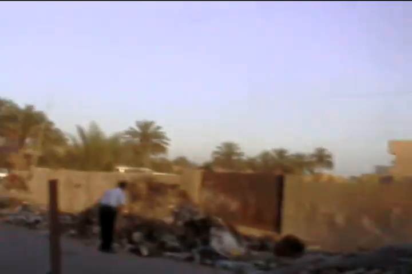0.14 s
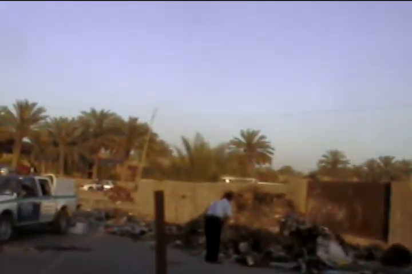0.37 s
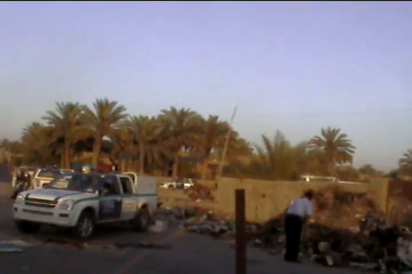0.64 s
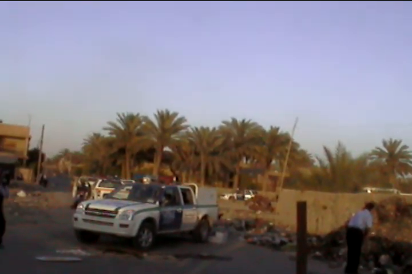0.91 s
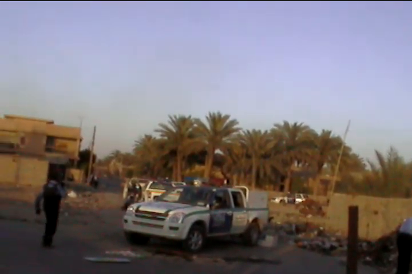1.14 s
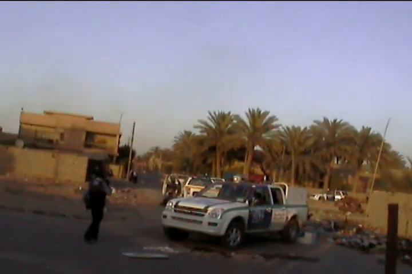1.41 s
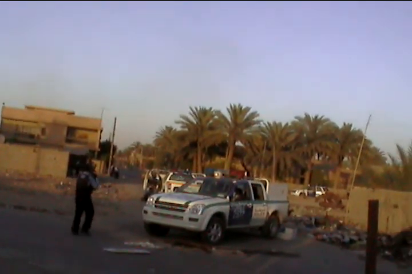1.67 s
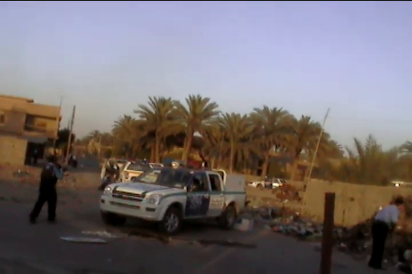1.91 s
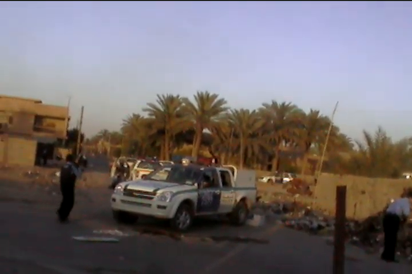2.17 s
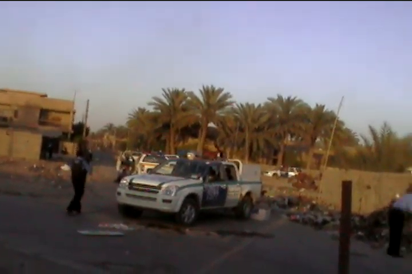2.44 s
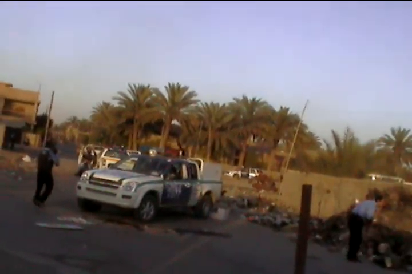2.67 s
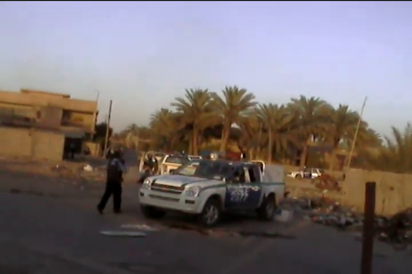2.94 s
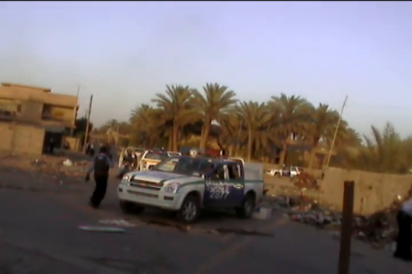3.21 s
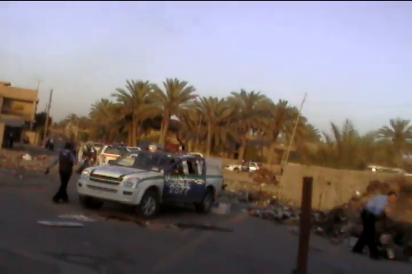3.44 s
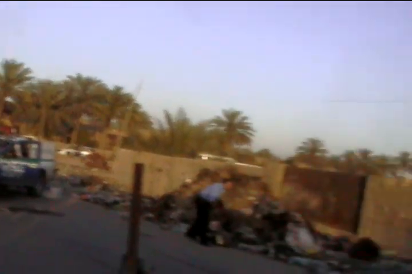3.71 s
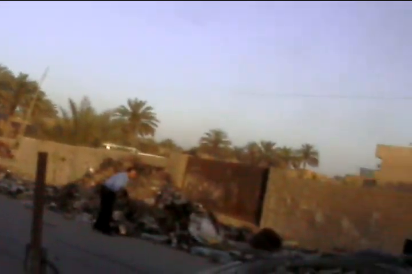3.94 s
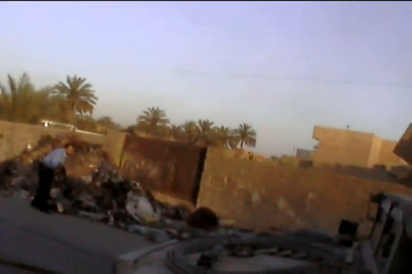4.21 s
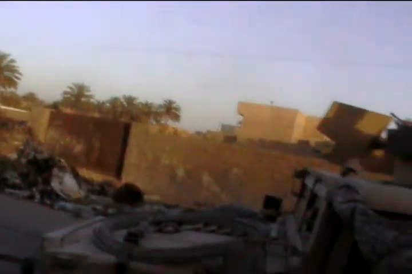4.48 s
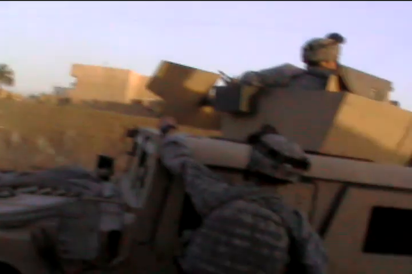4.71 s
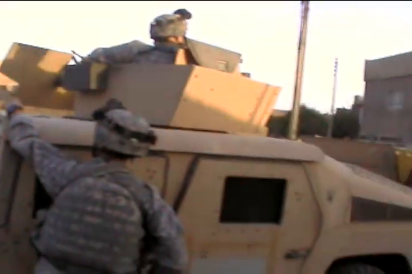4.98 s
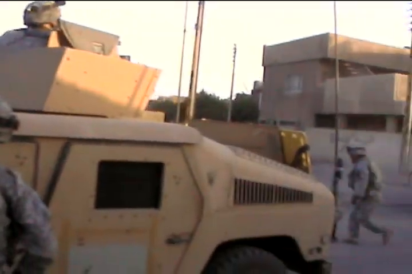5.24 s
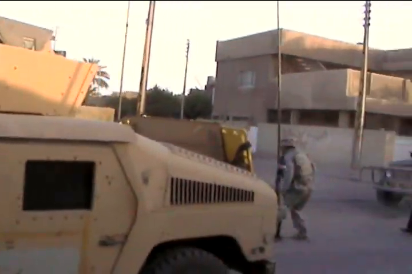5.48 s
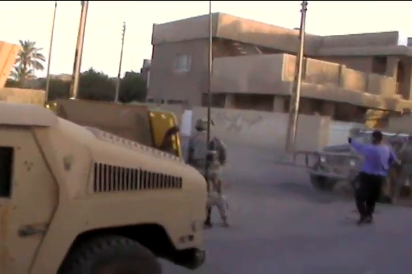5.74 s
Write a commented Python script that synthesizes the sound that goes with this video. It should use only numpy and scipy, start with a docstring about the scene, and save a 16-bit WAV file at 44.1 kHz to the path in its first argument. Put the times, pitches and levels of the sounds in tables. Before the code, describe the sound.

Uneven single rifle shots crack and echo off street walls, one duller shot follows, then three loud close machine-gun bursts overload a small camera microphone.

```python
"""Gunfire in a walled street

A small camera's microphone hears single uneven rifle shots, one shot of a second weapon, then three
bursts of a near machine gun. Each shot is pressure jumps, then thuds, scattered noise and cracks along
wall paths, then decaying street noise. Filtered noise is distant traffic, a wavering tone an idling engine.
The camera overloads: its input clips, a limiter pulls the level down, and hiss lies over both channels."""
import sys
import numpy as np
from scipy import signal
from scipy.fft import rfft, irfft, next_fast_len
from scipy.io import wavfile
from scipy.ndimage import uniform_filter1d

SR = 44100
rng = np.random.default_rng(int(sys.argv[2]) if len(sys.argv) > 2 else 0)


def volts(x):
    """Linear amplitude factor 10**(x/20) for a level x in dB, scalar or array-like."""
    e = np.asarray(x, float) / 20
    return 10 ** e


def pcm_store(signal):
    """Save signal as 16-bit PCM."""
    levels = np.round(np.clip(np.atleast_2d(signal), -1, 1) * 32767)
    wavfile.write(sys.argv[1], SR, levels.astype(np.int16).T)


N = 259041
LENGTH = 60000  # samples made for each shot


def evened(x):
    """Scales to rms 1."""
    return x / np.sqrt(np.mean(x ** 2) + 1e-20)


def read(points, hz):
    """Reads a table on a log-frequency axis."""
    f, value = np.transpose(points)
    return np.interp(np.log(hz + 1), np.log(f + 1), value)


def coloured(x, points, lag=0):
    """Filters by a spectrum, with an optional lag in samples."""
    hz = np.fft.rfftfreq(x.shape[-1], 1 / SR)
    delay = np.exp(-2j * np.pi * hz * lag / SR)
    return irfft(rfft(x) * volts(read(points, hz)) * delay, x.shape[-1])


def add(mix, events, sounds):
    """Places sounds at their times and levels; the mix starts one second early."""
    for (start_s, db), sound in zip(events, sounds):
        part = mix[round((start_s + 1) * SR):][:len(sound)]
        part += volts(db) * sound[:len(part)]


# Rifle, single shots: t/s, level/dB
RIFLE_SHOTS = [(-.16, 1), (-.0105, -2.5), (.142, -0.5), (0.3322, -1.5), (0.4739, -1), (0.608, -1.5),
               (0.7213, -1), (1.0897, -1.5), (1.2946, -1), (1.445, -0.5), (1.6066, -0.5), (1.799, -0.5)]
# Rifle pressure jumps, each a push and a longer pull: delay t/s, level/dB, push t/s
RIFLE_BLASTS = [(0, 6, 0.00094), (.0015, 15.5, 0.0011), (0.018, 9, 0.00063), (.02, 12, 0.0013)]
# Rifle, direct sound and wall echoes: delay t/s, thud level/dB, thud f/Hz, t60/s, scatter level/dB
RIFLE_PATHS = [(0, -8.5, 638, 0.038, -2), (.0045, -19, 538, 0.048, -11), (.0175, 6, 444, 0.034, 6),
               (.004, -17, 85, 0.047, -25.5), (0.02, -0.5, 156, 0.056, -23.5),
               (0.031, -22.5, 387, 0.11, -16), (.121, -8, 700, 0.029, -29), (.125, -3.5, 476, 0.016, -24),
               (.153, -3.5, 528, 0.046, -18.5), (.157, -5.5, 445, 0.019, -25.5),
               (.2, -34, 540, 0.61, -28.5), (.24, -11.5, 498, 0.055, -24)]
# Rifle blast scattered off walls and cars: f/Hz, level/dB per Hz
RIFLE_SCATTER = [(47, -41), (80, -16), (345, -8), (522, -5.5), (756, -7), (948, -15), (1320, -12),
                 (2070, -17), (5570, -30), (11000, -46.5), (14300, -77), (22000, -120)]


def rifle(mix):
    """Uneven single shots, thrown back by the walls along the same paths each time."""
    cracks = (-9, -17.5, 170)  # direct level/dB, echo level at zero delay/dB, loss in dB per s of delay
    heard = shots(len(RIFLE_SHOTS), RIFLE_BLASTS, RIFLE_PATHS, cracks, RIFLE_SCATTER,
                  tail_db=-17.0, likeness=0.836, rise_s=0.014)
    add(mix, RIFLE_SHOTS, heard)


# Second weapon, its lone shot: t/s, level/dB
LONE_SHOT = [(2.4396, 1)]
# Its pressure jump, a push and a longer pull: delay t/s, level/dB, push t/s
LONE_BLASTS = [(0, 10.6, 0.0009)]
# Its direct sound and wall echoes: delay t/s, thud level/dB, thud f/Hz, t60/s, scatter level/dB
LONE_PATHS = [(0, -8.5, 230, 0.025, -6), (0.013, -14, 228, 0.057, -19), (0.052, -18, 320, 0.038, -21),
              (.2, -22, 420, .04, -30), (.245, -15, 507, 0.023, -28)]
# Its blast scattered off walls and cars: f/Hz, level/dB per Hz
LONE_SCATTER = [(47, -52), (80, -18), (220, -7), (442, -10), (615, -9.5), (948, -13.5), (3540, -20),
                (11000, -51), (14300, -86), (22000, -120)]


def second_weapon(mix):
    """One shot with a single pressure jump and its own wall echoes."""
    cracks = (-5.5, -22, 110)  # direct level/dB, echo level at zero delay/dB, loss in dB per s of delay
    heard = shots(1, LONE_BLASTS, LONE_PATHS, cracks, LONE_SCATTER,
                  tail_db=-23, likeness=0, rise_s=0.0035)
    add(mix, LONE_SHOT, heard)


# Near machine gun, bursts: first round t/s, level/dB, bass level/dB at 110 Hz, body level/dB at 310 Hz
BURSTS = [(2.9649, -0.13, -3.5, 1.5), (4.0621, -0.26, 2, 1), (5.1641, 0.5, -0.5, 4)]
# Rounds in each burst: count
ROUNDS = [6, 7, 8]
# Machine gun pressure jumps, each a push and a longer pull: delay t/s, level/dB, push t/s
GUN_BLASTS = [(0, 11.4, 0.0013), (0.018, 2.3, 0.0059)]
# Machine gun, direct sound and wall echoes: delay t/s, thud level/dB, thud f/Hz, t60/s, scatter level/dB
GUN_PATHS = [(0, 9, 793.6, 0.036, 8.5), (.002, 0, 70, 0.13, 6.5), (.016, 0, 312.2, 0.097, 0.5),
             (.028, 0, 782, 0.025, -23), (.042, -9, 798, 0.13, -4), (0.096, -16, 524, 0.033, -1),
             (0.117, -12.5, 469, 0.26, -17), (.17, -5.5, 500, 0.075, -19.5),
             (0.233, -30, 470, 0.032, -24.5), (0.292, -14, 348, 0.078, -35), (.365, -17, 559, 0.099, -29.5)]
# Machine gun blast scattered off walls and cars: f/Hz, level/dB per Hz
GUN_SCATTER = [(47, -18), (80, -6.5), (168, -12.5), (383, -3.5), (615, -3), (968, -9), (1240, -10),
               (1430, -10.5), (2650, -18), (5130, -26), (7290, -31.5), (11000, -51), (14300, -102),
               (22000, -120)]


def machine_gun(mix):
    """Bursts of evenly spaced rounds, each burst with its own balance of bass and body."""
    round_s, bright_db = 0.0836, 2.5  # time between rounds, lift at 850 Hz
    early = 400  # samples of room for the filter's ringing ahead of the shot, then cut
    cracks = (2.3, -24, 85)  # direct level/dB, echo level at zero delay/dB, loss in dB per s of delay
    for (first_s, db, bass_db, body_db), count in zip(BURSTS, ROUNDS):
        heard = shots(count, GUN_BLASTS, GUN_PATHS, cracks, GUN_SCATTER,
                      tail_db=-10.5, likeness=0.881, rise_s=0.059)
        shade = [(110, bass_db), (200, 0), (310, body_db), (520, 0.03), (850, bright_db), (1400, 0.015)]
        heard = coloured(heard, shade, lag=early)[:, early:]
        times = first_s + round_s * np.arange(count)
        add(mix, [(start_s, db) for start_s in times], heard)


def shots(count, blasts, paths, cracks, colour, tail_db, likeness, rise_s):
    """Pressure jumps, then a thud, scattered blast and crack on each path, then the street's tail."""
    scatter = evened(coloured(drifting_noise(count, likeness), colour))
    crack = sharp_fronts(count, likeness)
    out = pressure_jumps(blasts) + np.zeros((count, 1))
    add_paths(out, paths, cracks, scatter, crack)
    t = np.arange(LENGTH) / SR
    return out + volts(tail_db) * street_tail(scatter) * (1 - np.exp(-t / rise_s))


def drifting_noise(count, likeness):
    """One noise a shot, each much like the one before: the street stays, air and camera shift."""
    noise = rng.standard_normal((count, LENGTH))
    for k in range(1, count):
        noise[k] = likeness * noise[k - 1] + np.sqrt(1 - likeness ** 2) * noise[k]
    return noise


def pressure_jumps(blasts):
    """Each blast jumps up at once, decays through zero and pulls for longer than it pushed."""
    t = np.arange(LENGTH) / SR
    wave = np.zeros(LENGTH)
    for delay, db, push_s in blasts:
        u = np.maximum(t - delay, 0) / push_s
        wave += volts(db) * (1 - u) * np.exp(-u) * (t >= delay)
    return wave


# Sharp front of the blast: f/Hz, level/dB per Hz
CRACK = [(300, -17), (1500, -13.5), (4000, 5.5), (7000, -4), (11000, -34)]


def sharp_fronts(count, likeness):
    """Bright noise of uneven grain, as a few surfaces glint much louder than the rest."""
    facets = volts(3.0 * np.minimum(rng.exponential(1, LENGTH), 5))
    crack = evened(coloured(facets * drifting_noise(count, likeness * 0.98), CRACK))
    return crack * volts(1.5 * rng.standard_normal((count, 1)))  # rounds differ in sharpness


def add_paths(out, paths, cracks, scatter, crack):
    """Each path brings a ringing thud, scatter and a crack; echoed cracks weaken with the detour."""
    t = np.arange(LENGTH) / SR
    direct_db, echo_db, loss_db_per_s = cracks
    for k, (delay, thud_db, thud_hz, t60, scatter_db) in enumerate(paths):
        crack_db = echo_db - loss_db_per_s * delay if k else direct_db
        at = round(max(delay, 0) * SR)
        u = t[:min(round(1.5 * t60 * SR), LENGTH - at)]
        onset = 1 - np.exp(-u / (0.00013 + 0.0041 * max(delay, 0)))  # far echoes start softly
        fade = volts(-60 * u / t60) * onset
        span = slice(at, at + len(u))
        thud = volts(thud_db) * np.sin(2 * np.pi * thud_hz * u)
        scattered = volts(scatter_db) * scatter[:, span]
        sharp = volts(crack_db) * fade ** 1.18 * crack[:, span]  # the crack is gone first
        out[:, span] += fade * (thud + scattered + sharp)


# Reverberation of the street: f/Hz, t60/s
STREET = [(60, 1.17), (250, 1.56), (600, 1.22), (1500, 1.18), (4000, 1.165), (8000, 0.79)]


def street_tail(scatter):
    """The scattered blast dies away between the houses, which return it unevenly."""
    hz, frames, z = signal.stft(scatter, SR, nperseg=512)
    lumps = uniform_filter1d(rng.standard_normal(z.shape[1:]), size=12, axis=0)
    lumps = evened(uniform_filter1d(lumps, size=3, axis=1))
    lumps_db = lumps * read([(700, 4), (2500, 1.5)], hz)[:, None]  # the treble comes back more evenly
    decay_db = -60 * frames / read(STREET, hz)[:, None]
    return signal.istft(z * volts(lumps_db + decay_db), SR, nperseg=512)[1][:, :LENGTH]


def idling_engine():
    """The firing tone of an idling engine, wavering in pitch and level."""
    wander = uniform_filter1d(rng.standard_normal((2, N)), size=3000)
    wander = evened(uniform_filter1d(wander, size=3000))
    firing_hz = 50.7 * (1 + 0.032 * wander[0])
    tone = np.sqrt(2) * np.sin(2 * np.pi * np.cumsum(firing_hz) / SR)
    return volts(-36.5 + 1.5 * wander[1]) * tone


# Distant traffic, relative spectrum: f/Hz, level/dB per Hz
TRAFFIC = [(25, -34), (50, 2.5), (90, -10.5), (250, -26), (600, -18.5), (1250, -19), (2200, -21),
           (4000, -39), (7000, -45), (11000, -57)]


def distant_traffic():
    """Steady noise with the spectrum of far-off traffic, at -35.5 dB rms."""
    return volts(-35.5) * evened(coloured(rng.standard_normal(N), TRAFFIC))


def scene():
    """All weapons over the engine and traffic, at one microphone."""
    mix = np.zeros(N + SR)
    rifle(mix)
    second_weapon(mix)
    machine_gun(mix)
    return np.tile(mix[SR:] + idling_engine() + distant_traffic(), (2, 1))


def overloaded(x):
    """The input clips, then a limiter pulls the level down and lets go slowly."""
    clipped = np.clip(x, -0.8, 0.8)
    over_db = np.maximum(20 * np.log10(abs(clipped) + 1e-9) + 5.43, 0)
    recovery = np.arange(N) * 7.0 / SR  # 7 dB a second
    held_db = np.maximum.accumulate(over_db + recovery) - recovery
    r = np.exp(-1 / (0.0022 * SR))  # it takes hold within milliseconds
    return clipped / volts(signal.lfilter([1 - r], [1, -r], held_db))


# Noise that follows the sound, opposite in left and right: f/Hz, level/dB relative to the sound
FOLLOWING_NOISE = [(25, -15.5), (125, -24), (500, -20.5), (2000, -20), (8000, -7)]


def following_noise(x):
    """Faint noise that follows the sound's spectrum from moment to moment, made by random phases."""
    hz, _, z = signal.stft(x, SR, nperseg=512, noverlap=384)
    z = z * volts(read(FOLLOWING_NOISE, hz))[:, None] * np.exp(2j * np.pi * rng.random(z.shape))
    return signal.istft(z, SR, nperseg=512, noverlap=384)[1][:len(x)]


# Frequency response of the camera: f/Hz, level/dB
CAMERA = [(60, -2), (4000, -1.5), (7000, -1.5), (9500, -3.5), (11000, -11.5), (11700, -31), (12300, -80),
          (13000, -88)]


def camera_pair(x):
    """Sound plus opposite noise in left and right, in the camera's response; the left lags a little."""
    padded = np.pad(x, (0, next_fast_len(N + 2000) - N))
    noise = following_noise(padded)
    left = coloured(padded + noise, CAMERA, lag=2.074)
    right = coloured(padded - noise, CAMERA)
    return np.array([left, right])[:, :N]


# Hiss of the camera's electronics, relative spectrum: f/Hz, level/dB per Hz
HISS = [(5000, -20), (8000, -2), (10000, -0.5), (11200, 0), (11700, -43.5)]


def camera_hiss():
    """The electronics' own hiss, separate in each channel, at -71.5 dB rms."""
    return volts(-71.5) * evened(coloured(rng.standard_normal((2, N)), HISS))


def low_pass(x):
    """Removes everything above the highest recorded frequency."""
    return signal.sosfilt(signal.butter(12, 11810, fs=SR, output="sos"), x)


def record(dry):
    """The small camera overloads, makes two channels of the sound and adds its hiss."""
    finished = camera_pair(overloaded(dry[0])) + camera_hiss()
    return low_pass(finished)


dry = scene()
out = record(dry)
pcm_store(out)
```